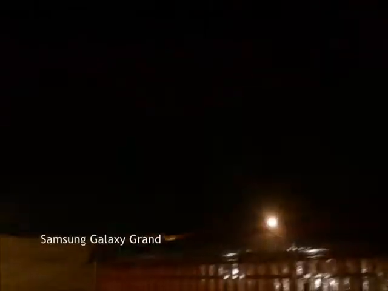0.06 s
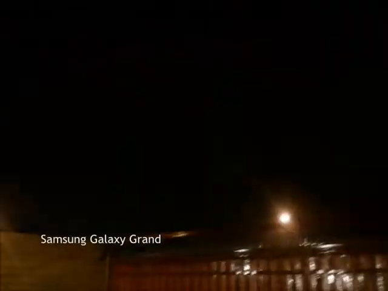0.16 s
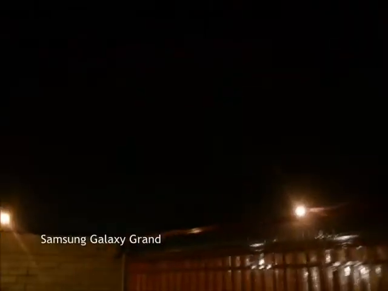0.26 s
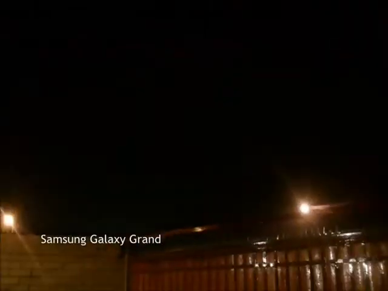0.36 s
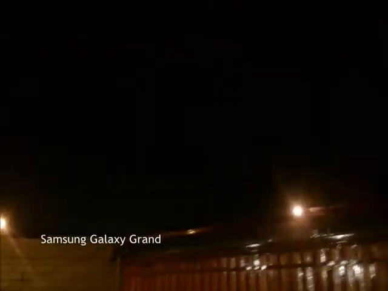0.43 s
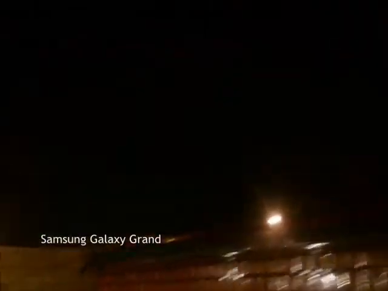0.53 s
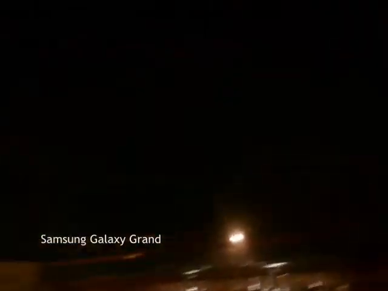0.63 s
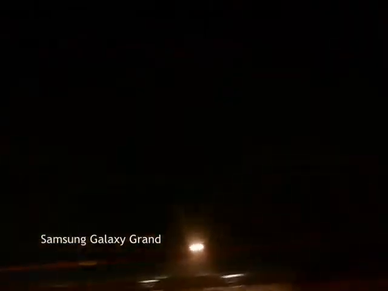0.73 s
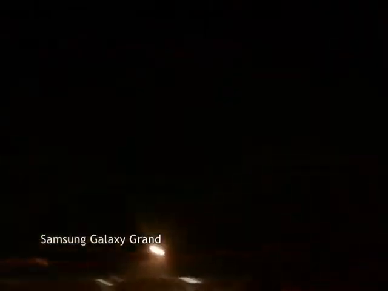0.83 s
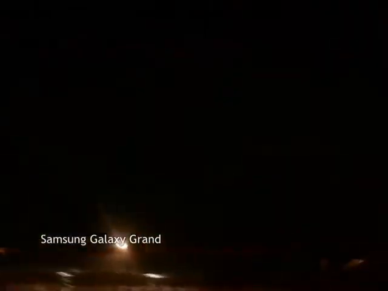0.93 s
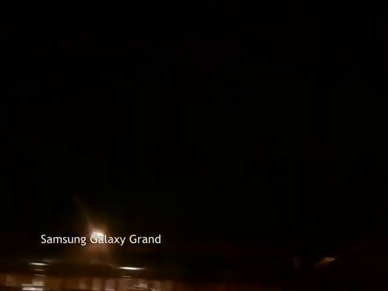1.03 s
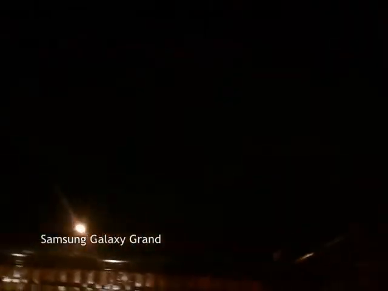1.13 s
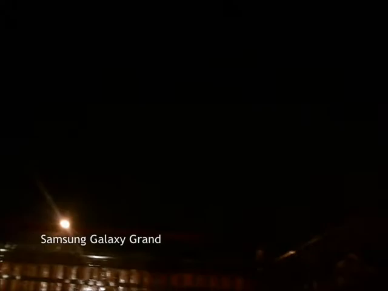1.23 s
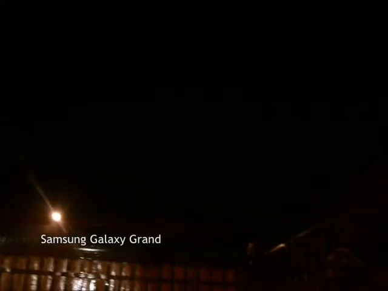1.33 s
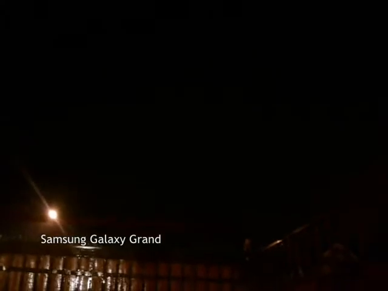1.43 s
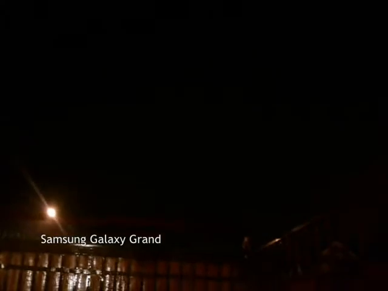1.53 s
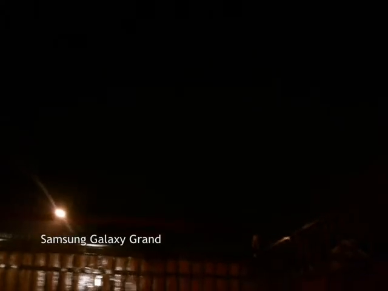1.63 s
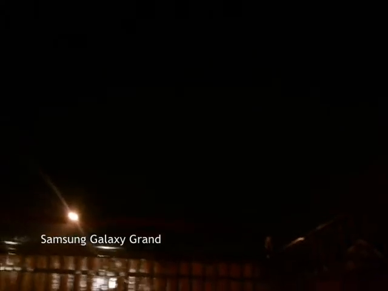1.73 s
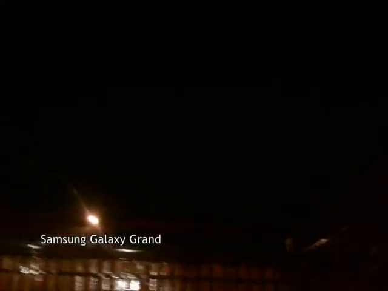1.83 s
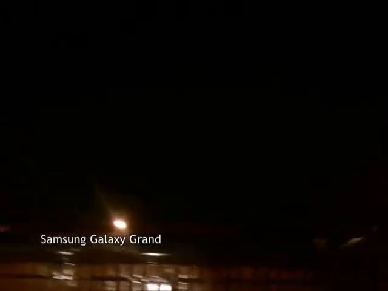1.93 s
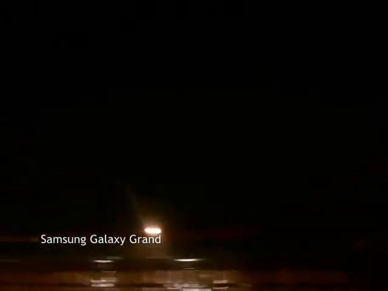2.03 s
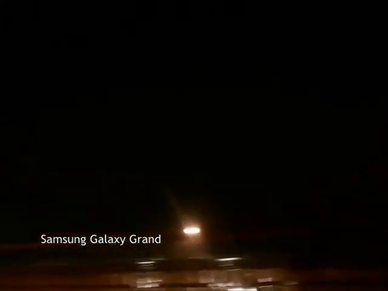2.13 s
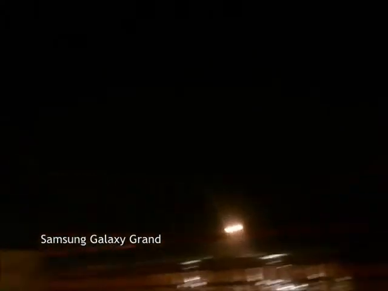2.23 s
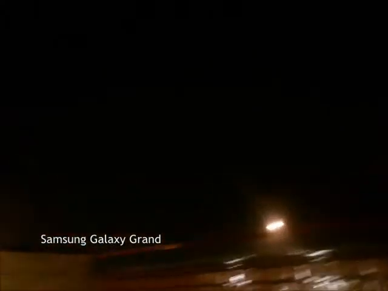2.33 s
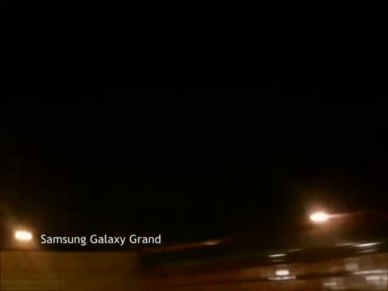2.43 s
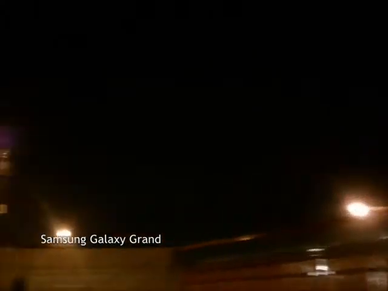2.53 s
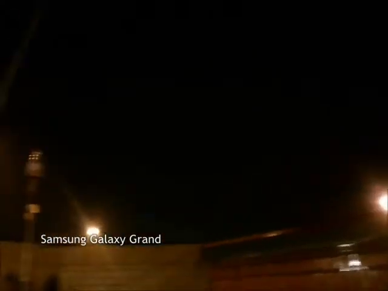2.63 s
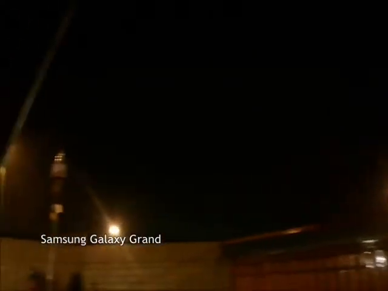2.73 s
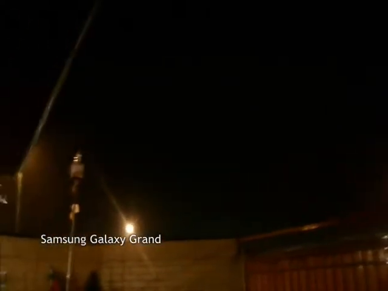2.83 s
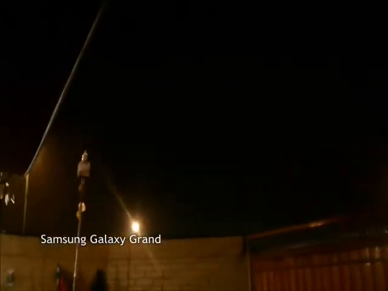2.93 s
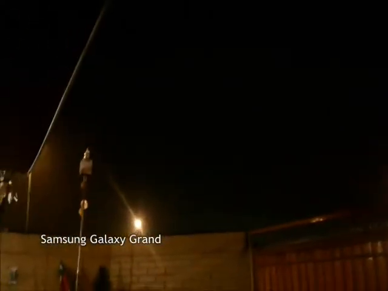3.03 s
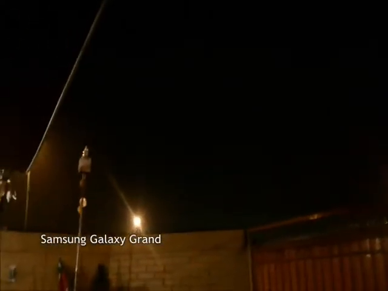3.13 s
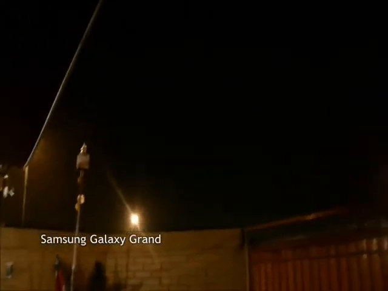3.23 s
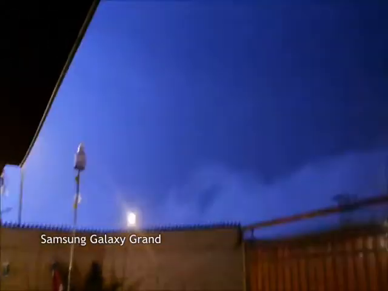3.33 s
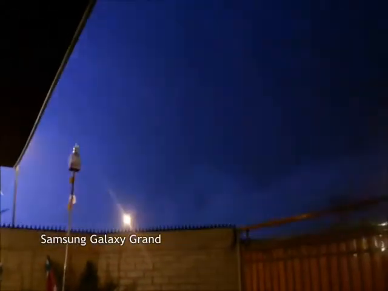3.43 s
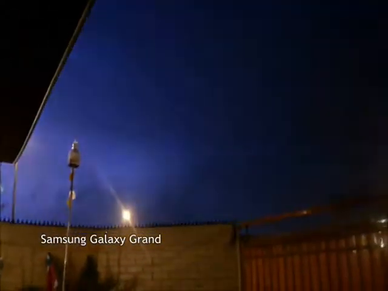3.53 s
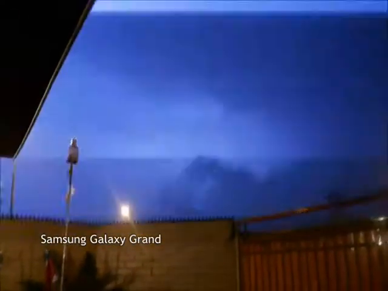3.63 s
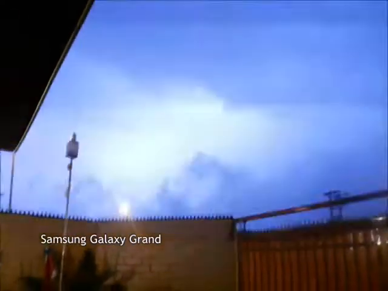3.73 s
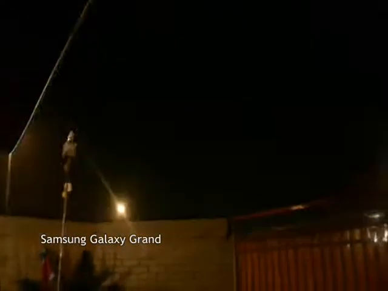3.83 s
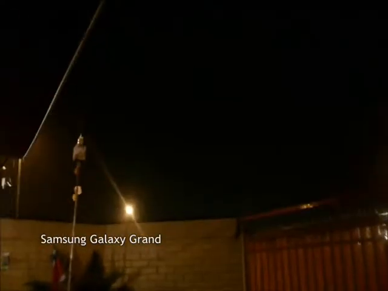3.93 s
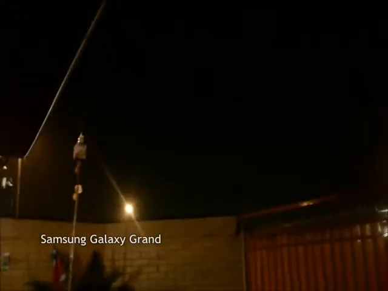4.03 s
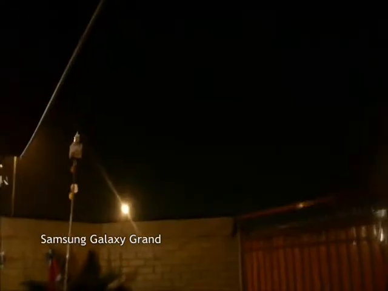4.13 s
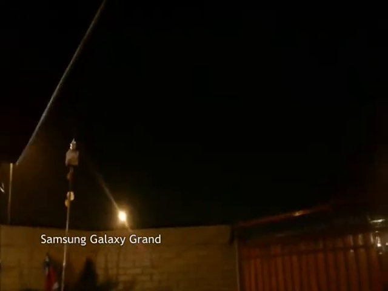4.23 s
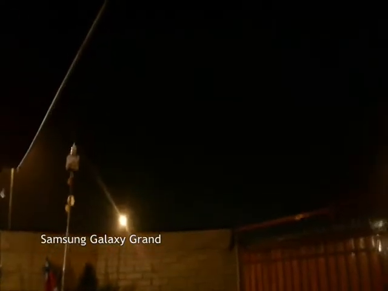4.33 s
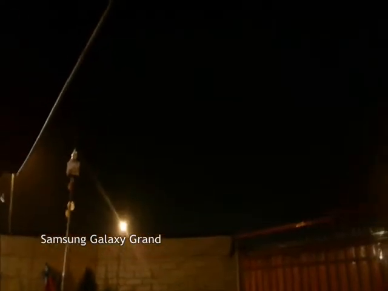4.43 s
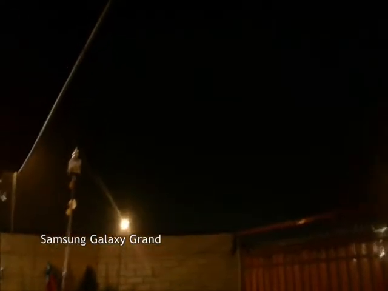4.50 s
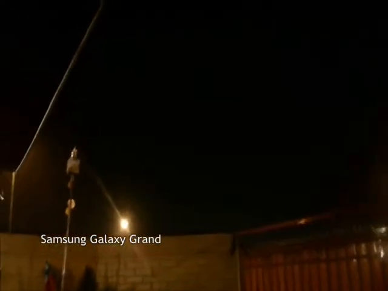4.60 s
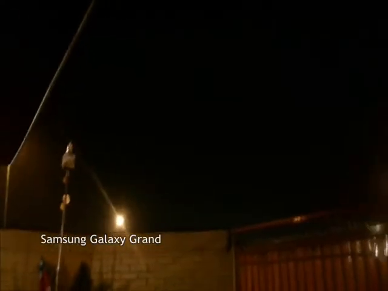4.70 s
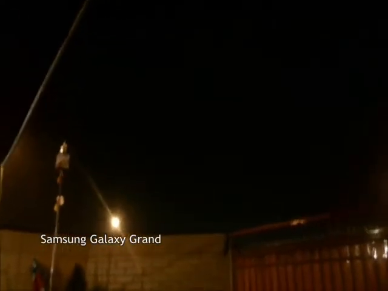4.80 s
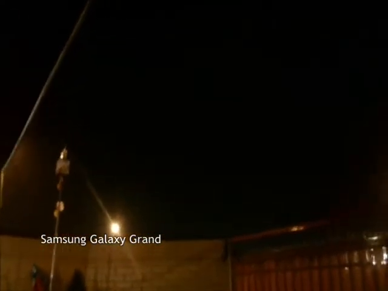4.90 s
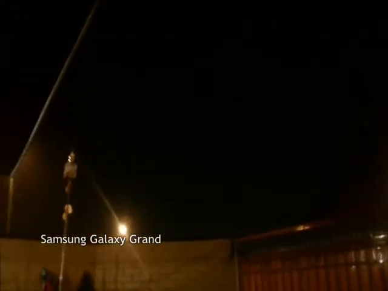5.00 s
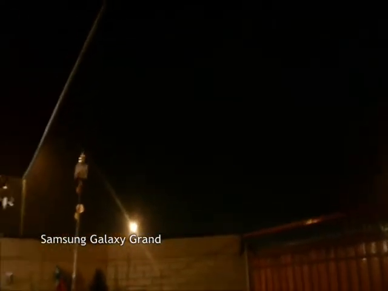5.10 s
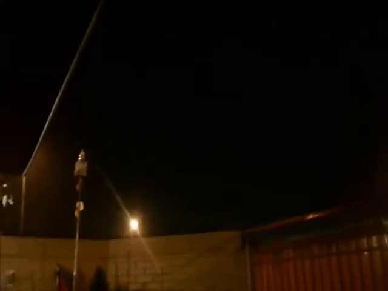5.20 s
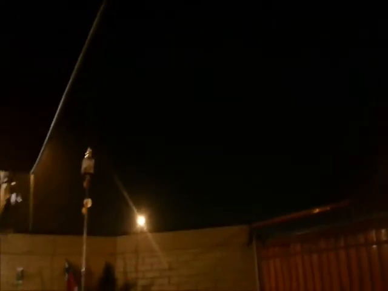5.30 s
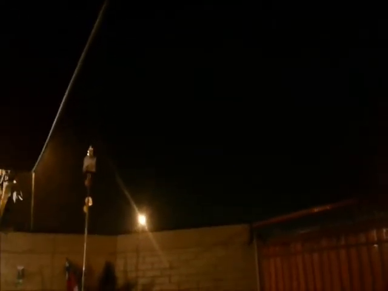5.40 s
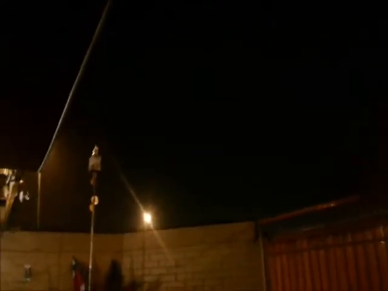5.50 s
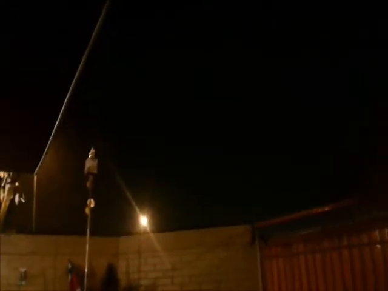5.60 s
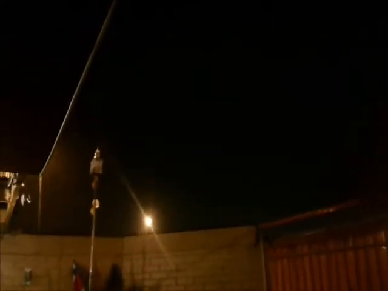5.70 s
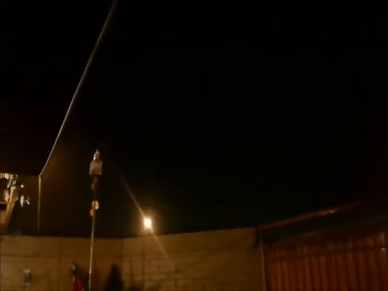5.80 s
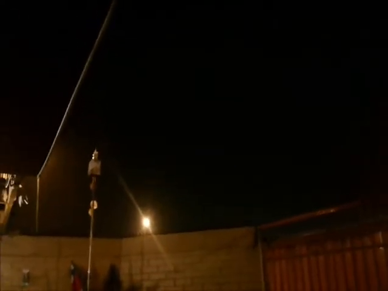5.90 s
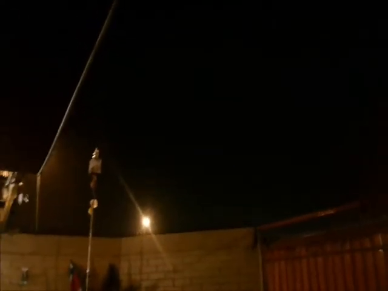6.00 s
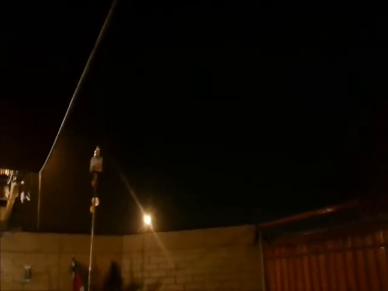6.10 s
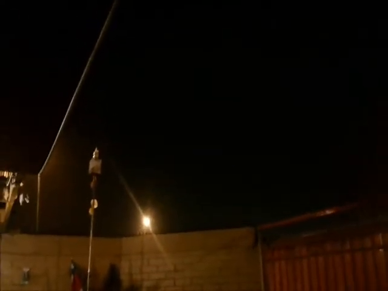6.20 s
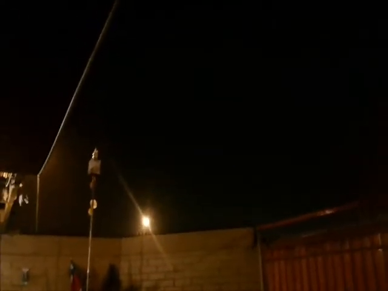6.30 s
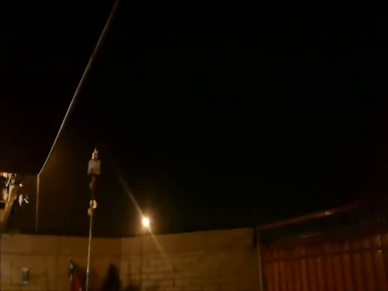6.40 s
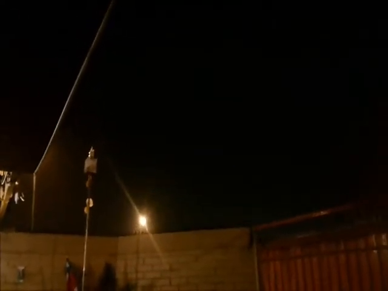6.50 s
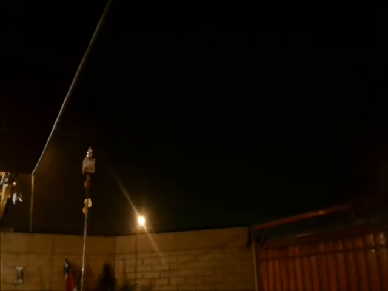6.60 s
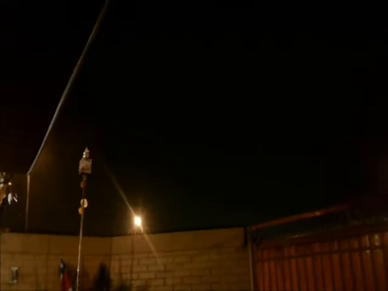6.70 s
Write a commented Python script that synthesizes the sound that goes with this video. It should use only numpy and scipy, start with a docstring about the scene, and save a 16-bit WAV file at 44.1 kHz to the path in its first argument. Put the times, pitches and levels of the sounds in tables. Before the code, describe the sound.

A night thunderstorm heard in a walled yard through a small handheld stereo microphone with limited treble. At 0 s there is a brief hush of noise and a low soft bump. Until about 1.9 s it stays very quiet: tiny falling peeps, low pips, thin wavering whistles and squeaks, probably birds, with drips between 0.5 and 1.6 s over faint rain hiss and distant muttering. Rumble swells from 1.6 s. At 2.1 s a high branch of lightning crackles, snapping and rattling most strongly until 2.7 s, then thinning into scattered knocks. At 3.8 s the main stroke explodes, enormously louder, with deep thumps and slightly squashed peaks. Claps, cracks and bangs tumble densely, surging around 4.1, 4.25 to 4.4 and 4.6 s, with another strong bang at 5.07 s. From 5.4 s it grows duller and hollow, bumping and rolling away to low rumble by 6.75 s.

```python
"""Faint chirps and drips over a low rumble, after a brief hush of noise and a low bump at the very start.
It is night in a walled yard, heard by two microphone ports. A high branch of lightning crackles,
then the main stroke arrives as a volley of claps and rolls away. Claps, rolls and crackle are crowds of
pressure shocks, one from each kink of the channel; long push-and-pull waves add thumps. Filtered noise
gives rumble and faint rain, gliding tones the calls. The walls throw back the thunder and the calls."""
import sys
import numpy as np
from scipy import signal
from scipy.fft import rfft, irfft, next_fast_len
from scipy.io import wavfile
from scipy.ndimage import uniform_filter1d

SR = 44100
rng = np.random.default_rng(int(sys.argv[2]) if len(sys.argv) > 2 else 0)


def put_to_file(sound):
    """Save the sound as 16-bit audio at rate SR, in the file named by the first command-line argument."""
    columns = np.atleast_2d(sound).T  # one column per channel
    safe = np.clip(columns, -1, 1)
    whole_steps = np.round(safe * 32767)
    wavfile.write(sys.argv[1], SR, whole_steps.astype(np.int16))


N = 297756  # length of the scene in samples


def gain_of(db):
    """Turns decibels into a gain."""
    return np.exp(np.asarray(db) * (np.log(10) / 20))


def evened(x):
    """Scales a signal to an rms of 1."""
    return x / np.sqrt(np.mean(x ** 2) + 1e-20)


def read(points, hz):
    """Reads a table between its rows, along a log-frequency axis."""
    f, value = np.transpose(points)
    return np.interp(np.log(hz + 1), np.log(f + 1), value)


def add(mix, s, sound):
    """Adds a two-channel sound into the mix at s seconds."""
    part = mix[:, max(round(s * SR), 0):][:, :sound.shape[1]]
    part += sound[:, :part.shape[1]]


def pulse(colour, size=4096):
    """Makes the pulse with this spectrum that starts at once (minimum phase), with a peak of 1."""
    log_gain = np.log(gain_of(read(colour, abs(np.fft.fftfreq(size, 1 / SR)))))
    spectrum = np.exp(np.conj(signal.hilbert(log_gain)))
    wave = np.fft.ifft(spectrum).real[:size // 2]
    return wave / abs(wave).max()


def through(x, response):
    """Convolves both channels with a response and keeps their length."""
    return signal.fftconvolve(x, np.atleast_2d(response), axes=1)[:, :x.shape[1]]


def arrivals(times, heights, size, lead_s, spread_s):
    """Places clicks at the two ports: the right port hears each after its own lag, lead_s on average."""
    lag = lead_s + spread_s * rng.standard_normal(len(times))
    places = [np.clip(np.round(t * SR), 0, size - 1).astype(int) for t in (times, times + lag)]
    return np.array([np.bincount(at, heights, size) for at in places])


def swell(t, start, attack, hold, level_db, fade_db_per_s):
    """Gives a gain over the times t that rises, holds, then dies away."""
    rise = np.clip((t - start) / attack, 0, 1)
    fading_s = np.maximum(t - start - attack - hold, 0)
    return rise * gain_of(level_db - fade_db_per_s * fading_s)


def note(length, pitch_hz, waver, fade_db=0, flutter_db=4.0):
    """A thin tone that glides through its pitches, unsteady in pitch and fluttering in strength."""
    u = np.linspace(0, 1, round(length * SR))
    jitter, flutter = rng.standard_normal((2, SR // 2))[:, :len(u)]
    glide_hz = np.interp(u, np.linspace(0, 1, len(pitch_hz)), pitch_hz)
    hz = glide_hz * (1 + waver * evened(uniform_filter1d(jitter, size=60)))
    flutter = flutter_db * evened(uniform_filter1d(flutter, size=500))
    arch = np.sin(np.pi * u).clip(0) ** .5
    strength = gain_of(flutter - fade_db * u) * arch
    tone = evened(np.sin(2 * np.pi * np.cumsum(hz) / SR) * strength)
    return np.array([tone, tone])


# Small far calls, probably birds. All their levels are relative: chirps() shifts them together.
# Pitches in Hz that a call glides through from start to end: peep, twitter, pip and warble.
PEEP_HZ = (8700, 8230, 8100, 7850, 7250)
TWITTER_HZ = (7530, 7200, 6900, 6850, 6800, 6750)
PIP_HZ = (940, 1030, 1060)
WARBLE_HZ = (8900, 8400, 7980, 8500, 7960, 8350, 7500)
# High falling peeps. Each row: start in seconds, length in seconds, pitch factor, level in dB.
PEEPS = [(.005, 0.078, 1.0, -73.5), (.131, .068, 1.0, -70), (0.265, 0.049, 0.98, -69)]
# Wavering high notes. Each row: start in seconds, level in dB.
TWITTERS = [(0.975, -71.5), (1.11, -72), (1.262, -74.5)]
# Long whistles that rise or sag. Each row: start in seconds, length in seconds, start, middle and
# end pitch in Hz, level in dB, fade over the whole whistle in dB (below 0 it grows).
WHISTLES = [(0.521, 0.049, 2460, 2650, 2820, -78, -5), (0.554, 0.08, 2810, 2870, 2810, -68.5, 3),
            (0.644, 0.15, 2750, 2765, 2520, -69.5, -6), (.8, 0.095, 2720, 2650, 2540, -79, 0),
            (1.327, 0.251, 2855, 2787, 2755, -62.5, 11), (1.631, 0.24, 2864, 2806, 2710, -68.5, 0),
            (1.853, .15, 2800, 2780, 2730, -80, 1)]
# Low rising pips. Each row: start in seconds, level in dB.
PIPS = [(0.185, -67.5), (.343, -70.5), (.482, -64.5), (1.304, -68), (1.391, -71), (1.526, -72)]
# Short rough squeaks. Each row: start in seconds, middling pitch in Hz, level in dB.
SQUEAKS = [(.8, 3000, -71), (1.03, 2220, -74.5), (1.298, 2970, -71), (1.525, 2570, -67), (1.735, 1750, -72)]
WARBLE_AT_S, WARBLE_S, WARBLE_DB = 1.607, 0.04, -59
TWITTER_S, PIP_S, SQUEAK_S = .14, 0.026, .028  # lengths


def chirps(level_db=-1.2):
    """Small calls heard before the thunder breaks, each a gliding tone, the same in both channels."""
    out = np.zeros((2, N))
    squeak_arch = 1 + 0.05 * np.array([-1, 1, -1])  # the pitch goes up and back down
    calls = []
    for s, length, pitch, db in PEEPS:
        calls.append((s, db, note(length, pitch * np.array(PEEP_HZ), waver=0.019)))
    for s, db in TWITTERS:
        calls.append((s, db, note(TWITTER_S, TWITTER_HZ, waver=0.0236, fade_db=8)))
    for s, length, *pitches, db, fade in WHISTLES:
        calls.append((s, db, note(length, pitches, waver=0.018, fade_db=fade, flutter_db=3.0)))
    calls.append((WARBLE_AT_S, WARBLE_DB, note(WARBLE_S, WARBLE_HZ, waver=0.0063)))
    for s, db in PIPS:
        calls.append((s, db, note(PIP_S, PIP_HZ, waver=.006, flutter_db=4.0)))
    for s, hz, db in SQUEAKS:
        calls.append((s, db, note(SQUEAK_S, hz * squeak_arch, waver=0.074)))
    for s, db, tone in calls:
        add(out, s, gain_of(level_db + db) * tone)
    return out


# Colour of the deep noise. Each row: frequency in Hz, relative level in dB.
DEEP_COLOUR = [(10, -29.5), (28, -10.5), (46, -5.5), (63, -9), (100, -16), (250, -40.5), (1000, -101.5)]
# A brief low bump at the very start, then swells of deep rumble. Each row: start in seconds,
# attack in seconds, hold in seconds, level in dB, fade in dB per second.
BUMP_AND_RUMBLES = [(0, 0.0077, 0.02, -52, 163), (1.594, 0.64, 1.1, -48.5, 12.5),
                    (3.793, 0.008, 0.063, -22, 74.5), (3.799, 0.1, 0.32, -34, 9.5),
                    (5.0, 0.27, .5, -44, 14.5)]
NIGHT_DEEP_DB = -62.5  # the steady rumble of the far storm


def rumble(apart=0.35):
    """Deep filtered noise, nearly the same at both ports: a steady bed, a brief bump, then swells."""
    t = np.arange(N) / SR
    power = gain_of(NIGHT_DEEP_DB) ** 2 + sum(swell(t, *row) ** 2 for row in BUMP_AND_RUMBLES)
    noise = rng.standard_normal((1, N)) + apart * rng.standard_normal((2, N))
    return np.sqrt(power) * evened(through(noise, pulse(DEEP_COLOUR)))


def volley(length, shocks_per_s, uneven_db, front, fade_db, build=0, size=8192):
    """A crowd of shocks of either sign: it breaks with a front shock, or builds up first, then fades."""
    times, sizes, signs, keep = rng.random((4, 128))  # times as shares of the length
    heights_db = uneven_db * np.minimum(-np.log(sizes), 2.5) - fade_db * times
    heights = gain_of(heights_db) * np.sign(signs - .5)
    heights *= keep < shocks_per_s * length / len(keep)  # thin the crowd to the wanted density
    build = np.clip(build, 1e-3, 1)
    heights *= np.minimum(times / build, 1)
    times[0], heights[0] = 0, front * (1 - build) ** 4  # a slow build weakens the front shock
    return arrivals(times * length, heights, size, lead_s=0.00024, spread_s=.00006)


# Colour of a bright click. Each row: frequency in Hz, relative level in dB.
CLICK_COLOUR = [(300, -5), (1500, -4), (3000, 3), (4200, 0), (6000, -9), (8500, -17), (10500, -34.5)]


def spits(rows, length, front, shocks_per_s):
    """Bright clicks, each frayed by a short spray of smaller ones."""
    out, wave = np.zeros((2, N)), pulse(CLICK_COLOUR)
    for s, peak_db in rows:
        spray = volley(length, shocks_per_s, uneven_db=0, front=front, fade_db=2.5)
        add(out, s, gain_of(peak_db) / front * through(spray, wave))
    return out


# Colour of the faint wash. Each row: frequency in Hz, relative level in dB.
WASH_COLOUR = [(100, 1.5), (900, 8), (1800, 1.5), (2600, 2.5), (5500, -0.5), (8500, -2.5), (10500, -15)]
# Loudness of the faint wash over time: a brief hush of noise at the very start, then faint rain.
# Each row: time in seconds, level in dB.
WASH_LEVEL = [(0, -63.5), (.17, -79), (.5, -78.5), (1.3, -72), (6.75, -74)]
# Soft splashes of nearer drips. Each row: start in seconds, approximate peak in dB.
DRIPS = [(.503, -61), (.76, -63), (.862, -58), (1.2, -51.5), (1.398, -54), (1.585, -57)]


def wash_and_drips():
    """Filtered noise as a brief hush, then very faint rain, with a few drips as frayed clicks."""
    gain = gain_of(np.interp(np.arange(N) / SR, *np.transpose(WASH_LEVEL)))
    wash = gain * evened(through(rng.standard_normal((2, N)), pulse(WASH_COLOUR)))
    return wash + spits(DRIPS, length=0.017, front=2.0, shocks_per_s=2300)


# Standing waves between the walls. Each row: frequency in Hz, width in Hz, relative gain.
STANDING = [(43, 8.2, 1.4), (89, 13, 1.28), (145, 22.5, 1.41), (189.6, 26.6, 1.27), (258, 9.9, 1.04),
            (318, 30, 0.51), (391, 39, 0.24)]


def shock(colour, ring, standing=STANDING):
    """One pressure shock, with the air between the walls ringing after it."""
    wave = pulse(colour)
    ringing = 0
    for hz, width, gain in standing:
        b, a = signal.iirpeak(hz, hz / width, fs=SR)
        ringing = ringing + gain * signal.lfilter(b, a, wave)
    return wave + ring * ringing


def crowd(wave, uneven_db, clump_db, count=20000):
    """Dense shocks from all over the sky, their strength rising and falling in clumps."""
    times = rng.uniform(0, N / SR, count)
    clumps = np.interp(times, np.linspace(0, N / SR, 256), rng.standard_normal(256))
    heights_db = uneven_db * np.minimum(rng.exponential(1, count), 4) + clump_db * clumps
    heights = gain_of(heights_db) * rng.choice([-1, 1], count)
    return through(arrivals(times, heights, N, lead_s=.00013, spread_s=.00019), wave)


# Colours of the thunder shocks, also used by the claps. Each row: frequency in Hz, relative level in dB.
# Distant thunder, its treble lost to the air:
DISTANT = [(20, -4.5), (45, 5), (100, -6), (190, 0.5), (310, 0), (420, -9.5), (700, -12), (1100, -19),
           (1600, -41.5), (3000, -45.5), (10500, -69)]
# The high branch, thinner than the main stroke:
BRANCH = [(20, -6.5), (45, 6), (120, -1), (200, 1.5), (350, -1.5), (600, 1), (1200, 3), (1850, -1),
          (2700, 3), (4000, -6.5), (6000, -19.5), (8000, -34), (10500, -86)]
# The main stroke:
STROKE = [(22, -31), (45, -7), (110, -1.5), (200, 0), (350, -6), (550, -3.5), (1200, -6), (1850, -16.5),
          (2700, -16), (4000, -31), (6000, -49), (8000, -62), (10500, -73.5)]
# The last shocks, from the far end of the channel:
LATE = [(22, -35), (45, -9.5), (110, 1), (200, -1), (350, -8.5), (600, -8.5), (1250, -6.5), (1850, -16),
        (2700, -17.5), (4000, -32.5), (6000, -42), (10500, -72)]
# Standing waves rung by the last shocks. Each row: frequency in Hz, width in Hz, relative gain.
LATE_STANDING = [(46, 9.6, 1.2), (108, 35, 0.5), (187.7, 19, 1.78), (268, 15, 2.7), (432, 22, 2.3),
                 (604, 55, 0.31)]
# How strongly the mutter, the branch and the stroke ring the yard: three factors in that order.
ROLL_RINGS = (.5, 0.94, 0.92)
# Rolls of countless farther shocks. Each row: start in seconds, attack in seconds, hold in seconds,
# level in dB before the treble change, fade in dB per second, treble lost in dB per kHz (below 0: gained).
ROLLS = [(0, 0.0084, 5.1, -61, 30, 10.5), (1.621, 0.29, 0.041, -45, 71, 2.5),
         (2.115, 0.13, 0.043, -39, 41, -1.5), (2.122, 0.0092, 2, -41.5, 30, 0.43),
         (3.18, 0.93, 0.011, -38.5, 49.5, -2), (3.786, 0.038, 0.45, -29, 12.5, -2.16),
         (4.49, 0.057, 0.73, -30.5, 29.5, -0.74), (5.47, 0.3, 0.68, -41, 8, 3.5)]
BRANCH_S, STROKE_S, VOLLEY_S, LATE_S = 2.11, 3.78, 3.95, 5.42  # when each part of the thunder begins


def roll(uneven_db=2.5, clump_db=1.43, size=512):
    """Crowds of shocks: distant mutter, thin rattle of the branch, heavy roll, hollow end."""
    out = 0
    waves = [shock(colour, ring) for colour, ring in zip((DISTANT, BRANCH, STROKE), ROLL_RINGS)]
    waves.append(shock(LATE, ring=0.64, standing=LATE_STANDING))
    for part, wave in enumerate(waves):
        hz, t, z = signal.stft(evened(crowd(wave, uneven_db, clump_db)), SR, nperseg=size)
        power = 0
        for start, attack, hold, db, fade_db_per_s, loss_db in ROLLS:
            if np.digitize(start + attack, [BRANCH_S, STROKE_S, LATE_S]) == part:
                treble = gain_of(-loss_db * hz[:, None] / 1000)
                power = power + (swell(t, start, attack, hold, db, fade_db_per_s) * treble) ** 2
        out = out + z * np.sqrt(power)
    return signal.istft(out, SR, nperseg=size)[1][:, :N]


def patchy(x, patchy_db=2.0, size=768):
    """Moving air focuses and scatters the shocks, so patches of the spectrum swell and fade."""
    overlap = size * 3 // 4
    z = signal.stft(x, nperseg=size, noverlap=overlap)[2]
    patches = rng.standard_normal(z.shape[1:])
    for _ in range(2):
        patches = uniform_filter1d(patches, size=7, axis=0)  # smooth across frequency
        patches = uniform_filter1d(patches, size=9, axis=1)  # smooth across time
    z = z * evened(gain_of(patchy_db * evened(patches)))
    return signal.istft(z, nperseg=size, noverlap=overlap)[1][:, :N]


BOOM_TOP_HZ, BODY_TOP_HZ = 400, 1600
REGISTERS = [signal.butter(3, hz, kind, fs=SR, output="sos") for hz, kind in
             [(BOOM_TOP_HZ, "low"), ([BOOM_TOP_HZ, BODY_TOP_HZ], "band"), (BODY_TOP_HZ, "high")]]


def registers(x):
    """Splits a sound by frequency into boom, body and crack."""
    return [signal.sosfilt(band, x) for band in REGISTERS]


# Colour of the stroke's opening blow. Each row: frequency in Hz, relative level in dB.
BLOW = [(22, -16.5), (45, 3), (95, -0.5), (140, 0.5), (220, -14.5), (390, 0.5), (550, -9), (1200, -11.5),
        (1850, -24), (2700, -20.5), (4000, -28), (6000, -40.5), (10500, -76)]
# Claps, each a stretch of channel heard at once. Each row: start in seconds, length in seconds,
# relative level in dB, brightness in dB (crack up, boom down by this much), extra body in dB,
# share of the length spent building up (0 to 1).
CLAPS = [(0.209, 0.077, -56.5, -1, -0.5, 0.0), (0.772, 0.05, -70, -4, -4, 0.0),
         (1.24, 0.11, -60.5, -3.0, -1.5, 0.0), (1.587, 0.067, -49.5, -1.5, 1.5, 0.22),
         (2.156, 0.014, -30, 3.5, 2.5, 0), (2.223, 0.017, -33, 7.5, 4.5, 0.05),
         (2.268, 0.011, -33.5, 0, 8.5, 0.05), (2.284, 0.011, -31, 0, 3.5, 0.034),
         (2.324, 0.029, -29.5, 2.5, 7.5, 0.055), (2.382, 0.034, -23.5, 1.5, 3.5, 0.1),
         (2.5, 0.03, -28.5, -0.5, 2, 0.057), (2.544, 0.026, -34.5, -6.5, 1, 0.05),
         (2.621, 0.01, -38, 6, -3, 0), (2.689, 0.021, -40, 5, 0.0, 0.2),
         (2.725, 0.046, -31.5, -2.0, -0.5, 0.14), (2.851, 0.05, -48, -7.0, -19, 0.4),
         (2.935, 0.037, -42, -5.5, 3, 0.64), (2.976, 0.022, -33, -2, -0.5, 0.027),
         (3.086, 0.023, -35, -2, 1, 0.0), (3.185, 0.017, -45.5, 8, -13, 0.37),
         (3.26, 0.019, -39, -2, -0.5, 0.12), (3.335, 0.031, -36.5, -5.5, -8.5, 0.3),
         (3.41, 0.023, -45.5, -6.5, 7, 0), (3.59, 0.029, -42.5, -3, 5, 0),
         (3.698, 0.027, -36.5, -2.5, 6, 0), (3.765, 0.029, -32.5, -5.5, 3.5, 0),
         (3.793, 0.016, -10, 0.5, -6, 0), (3.821, 0.034, -11.5, 1, 0, 0.12),
         (3.863, 0.013, -9.0, 4.5, -2, 0), (3.886, 0.033, -20, -0.5, -1, 0.27),
         (3.97, 0.026, -15, 1.5, 0, 0.35), (4.025, 0.025, -17, 1, 4, 0.05),
         (4.062, 0.022, -25.5, -5, 2.5, 0.37), (4.098, 0.021, -18, -1.5, 3, 0.42),
         (4.161, 0.015, -24.5, -5, -0.5, 0.51), (4.252, 0.032, -16.5, -5.5, -2.5, 0.08),
         (4.284, 0.032, -18.5, 0, -2, 0.3), (4.32, 0.024, -18.5, 0, -1, 0.25),
         (4.357, 0.015, -24.5, -2.5, -3, 0.27), (4.381, 0.016, -16, 1.5, -0.5, 0),
         (4.399, 0.029, -19.5, -8.5, 1, 0), (4.441, 0.034, -22.5, 3, 1.0, 0.27),
         (4.518, 0.02, -29, -0.5, 0.5, 0.83), (4.566, 0.038, -18.5, -0.5, -1.5, 0),
         (4.623, 0.025, -15, 3, -2.5, 0), (4.66, 0.03, -20, -5.5, 0.5, 0),
         (4.714, 0.033, -22.5, -4, 1.5, 0.72), (4.769, 0.037, -20, -3, -3, 0.008),
         (4.85, 0.036, -36.5, 0, -8, 0), (4.908, 0.019, -30, 11.5, 5, 0.1),
         (4.942, 0.04, -28.5, -2, -4.5, 0.3), (5.021, 0.023, -33.5, 10.5, -1, 0.73),
         (5.067, 0.025, -18.5, -1, -0.5, 0.076), (5.097, 0.024, -26.5, -4.5, -2, 0.015),
         (5.185, 0.038, -27.5, 3.5, 2.5, 0.19), (5.256, 0.033, -40, -6.5, 2, 0.73),
         (5.298, 0.017, -23.5, -1, 2, 0.12), (5.356, 0.043, -29, -3.5, 2.5, 0),
         (5.435, 0.017, -24.5, -3, -2.5, 0.095), (5.485, 0.035, -39.0, -2.5, -7, 0.11),
         (5.547, 0.024, -43, -11.5, -10, 0.52), (5.598, 0.045, -35, -10, -5, 0.033),
         (5.678, 0.05, -30, -1.5, -4.5, 0), (5.752, 0.039, -30, 1, -3, 0),
         (5.857, 0.039, -30, -1, 1.5, 0.3), (5.926, 0.02, -35.0, -0.5, 1.5, 0.49),
         (6.068, 0.015, -32, -5, -1.5, 0.26), (6.1, 0.038, -33.5, -2, -6, 0),
         (6.18, 0.039, -40, -3, 0, 0.0042), (6.455, 0.014, -43.5, -9.5, -11, 0),
         (6.49, 0.048, -44, -8.5, 2.0, 0.092), (6.555, 0.02, -52, -11, 10.5, 0.18),
         (6.608, 0.021, -44, -7.5, 4, 0.12), (6.654, 0.029, -50, -1, 7, 0.017)]


def claps(body_db=2.0, shocks_per_s=1200, uneven_db=4.5, front=1.87, fade_db=4):
    """Stretches of channel arrive as volleys: distant, branch, opening blow, main volley, far end."""
    out = np.zeros((2, N))
    waves = [shock(colour, ring=1.0) for colour in (DISTANT, BRANCH, BLOW, STROKE)]
    waves.append(shock(LATE, ring=1.7, standing=LATE_STANDING))
    # how much of each wave lies in boom, body and crack
    shares = [np.linalg.norm(registers(wave), axis=1) / np.linalg.norm(wave) for wave in waves]
    for s, length, db, bright_db, full_db, build in CLAPS:
        part = np.digitize(s, [BRANCH_S, STROKE_S, VOLLEY_S, LATE_S])
        clicks = volley(length, shocks_per_s, uneven_db, front, fade_db, build)
        bands = registers(through(clicks, waves[part]))
        gains = shares[part] * gain_of([db - bright_db, db + body_db + full_db, db + bright_db])
        sound = sum(gain * evened(band) for gain, band in zip(gains, bands))
        # the level refers to the clap's own length, not to the whole buffer
        add(out, s, sound * np.sqrt(length * SR / sound.shape[1]))
    return out


# Bursts of fine sizzle from the smallest kinks. Each row: middle in seconds, half length in seconds,
# level in dB at the middle.
SIZZLES = [(2.406, 0.59, -47.5), (4.059, 0.14, -34), (4.7, 0.27, -41), (5.111, 0.11, -45),
           (5.351, 0.12, -43), (5.745, 0.12, -55.5), (6.177, 0.16, -60.5)]


def sizzle(attack_s=0.037):
    """Tiny steep shocks in bursts that swell and fade, silent until the branch arrives."""
    t = np.arange(N) / SR
    gain = 0
    for s, half, db in SIZZLES:
        gain = gain + gain_of(db) * np.maximum(1 - ((t - s) / half) ** 2, 0) ** 2
    arrived = np.clip((t - BRANCH_S) / attack_s, 0, 1) ** 2
    return gain * arrived * evened(crowd(pulse(CLICK_COLOUR), uneven_db=3.0, clump_db=2.0))


# Sharp shocks from the nearest kinks. Each row: start in seconds, approximate peak in dB.
SNAPS = [(2.138, -34), (2.159, -22), (2.225, -38), (2.403, -29), (2.412, -24), (2.499, -24), (2.715, -26),
         (3.8, -15.5), (3.869, -27), (3.985, -12.5), (4.05, -13.5), (4.25, -16.5), (4.268, -10),
         (4.291, -9), (4.378, -7.5), (4.386, -12.5), (4.403, -10), (4.619, -9.5), (4.629, -16),
         (4.774, -13.5), (5.073, -19.5), (6.515, -45)]


def snaps():
    """The nearest kinks snap: a strong bright click, then a very short spray."""
    return spits(SNAPS, length=0.013, front=4.7, shocks_per_s=3200)


# Single strong shocks from large kinks. Each row: start in seconds, peak in dB.
BANGS = [(2.272, -20), (2.334, -20), (2.391, -18), (2.411, -17), (3.085, -25), (3.823, -9.5), (3.836, -9),
         (3.868, -1.5), (3.972, -16), (3.985, -10), (4.027, -13), (4.107, -5.5), (4.255, -11.5),
         (4.262, -9), (4.387, -9), (4.408, -7.5), (4.57, -16.5), (4.718, -14), (5.072, -7.5), (5.19, -18.5),
         (5.3, -14.5), (5.442, -19)]


def bangs():
    """Lone strong shocks that stand out of the claps."""
    out, wave = np.zeros((2, N)), shock(STROKE, ring=0.53)
    wave_at_peak_1 = wave / abs(wave).max()
    for s, peak_db in BANGS:
        click = arrivals(np.zeros(1), gain_of([peak_db]), len(wave), lead_s=0.00026, spread_s=.00005)
        add(out, s, through(click, wave_at_peak_1))
    return out


# Long pressure waves of the main stroke. Each row: start in seconds, length in seconds,
# peak in dB before the corners are rounded.
THUMPS = [(3.801, 0.0115, -8), (3.863, 0.0061, -13.5), (3.879, 0.015, -15), (4.255, 0.0048, -13),
          (4.288, 0.008, -7), (4.336, 0.027, -13.5), (4.402, 0.0055, -11), (5.075, 0.0059, -18.5)]


def thumps(soft_hz=450):
    """N-waves: a push that falls straight into a pull, its corners rounded by the air."""
    out = np.zeros((2, N))
    for s, length, peak_db in THUMPS:
        push_pull = np.linspace(1, -1, round(length * SR))
        add(out, s, gain_of(peak_db) * np.tile(push_pull, (2, 1)))
    return signal.lfilter(*signal.butter(2, soft_hz, fs=SR), out)


# Reverberation of the yard. Each row: frequency in Hz, time to fall 60 dB in seconds
# before the linger factor stretches it.
YARD = [(60, 0.59), (200, 0.64), (1000, 0.64), (2800, 0.58), (7000, 0.95), (9000, 0.15)]
# Echoes off the walls. Each row: typical delay in seconds, relative gain.
WALLS = [(.0052, 0.11), (0.0119, 0.075), (0.0223, .13), (.034, 0.25)]


def echoes(wet_db, scatter_db, linger, path_spread=.18, scatter_t60=0.031, low_hz=260, count=1600):
    """Wall echoes, quick scatter from eaves and ground, and a diffuse tail; long waves bend round it all."""
    clicks = rng.choice([-1., 1.], count)
    taps = arrivals(rng.uniform(.002, .7, count), clicks, SR, lead_s=0, spread_s=.00025)
    hz, t, z = signal.stft(taps, SR, nperseg=256)
    decay = gain_of(-60 * t / (linger * read(YARD, hz)[:, None]))
    tail = signal.istft(z * decay, SR, nperseg=256)[1][:, :SR]
    delays = rng.uniform(0.000983, .08, count)
    heights = rng.standard_normal(count) * gain_of(-60 * delays / scatter_t60)
    scatter = arrivals(delays, heights, SR, lead_s=0, spread_s=0.00034)
    wall_s, wall_gains = np.transpose(WALLS)
    wall_s = wall_s * (1 + path_spread * rng.uniform(-1, 1, len(WALLS)))
    response = arrivals(wall_s, wall_gains, SR, lead_s=0, spread_s=0.00019)
    response = response + gain_of(wet_db) * tail / np.linalg.norm(tail[0])
    response = response + gain_of(scatter_db) * scatter / np.linalg.norm(scatter[0])
    return signal.sosfilt(signal.butter(2, low_hz, "high", fs=SR, output="sos"), response)


def yard(x, wet_db, scatter_db, linger=0.8, turn_s=.11, count=6):
    """Sound enters from changing directions: it crossfades round a ring of echo patterns."""
    out, turn = 0, np.arange(N) / SR / turn_s
    for k in range(count):
        share = np.maximum(1 - abs((turn - k) % count - 1), 0)
        response = echoes(wet_db, scatter_db, linger)
        wet = through(x * np.sqrt(share), response)
        out = out + (x * share + wet) / np.sqrt(1 + np.sum(response[0] ** 2))
    return out


def scene():
    """Thunder and calls, each group with its own yard echo, plus wash, drips and rumble left dry."""
    calls = yard(chirps(), wet_db=-9, scatter_db=-8, linger=.8, count=3)
    far = yard(patchy(roll()) + sizzle(), wet_db=-5.5, scatter_db=-11.5)
    near = yard(claps() + snaps() + bangs() + thumps(), wet_db=-6.5, scatter_db=-7.0)
    return calls + wash_and_drips() + rumble() + far + near


# Left port over right port. Each row: frequency in Hz, difference in dB.
BALANCE_DB = [(60, 1), (150, 4.5), (300, 1), (1000, 0), (1500, -1.5), (2300, 4), (9000, 2)]
EDGE_HZ = 10500  # top of the band


def record(dry):
    """The two ports differ a little in colour; loud peaks are rounded; then the band limit."""
    size = next_fast_len(N, True)
    tilt_db = read(BALANCE_DB, np.fft.rfftfreq(size, 1 / SR)) / 2  # half up on the left, half down right
    ports = irfft(rfft(dry, size) * gain_of([tilt_db, -tilt_db]), size)[:, :N]
    rounded = ports / (1 + abs(ports) ** 4) ** (1 / 4)
    band_limit = signal.firwin(301, EDGE_HZ, window=("kaiser", 9), fs=SR)
    return signal.oaconvolve(rounded, band_limit[None], "same")


dry = scene()
out = record(dry)
put_to_file(out)
```